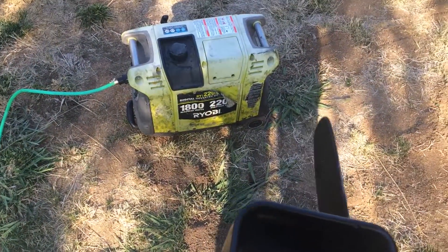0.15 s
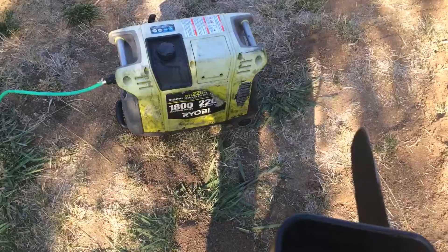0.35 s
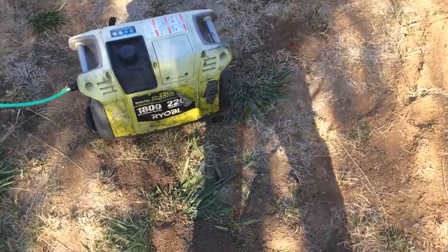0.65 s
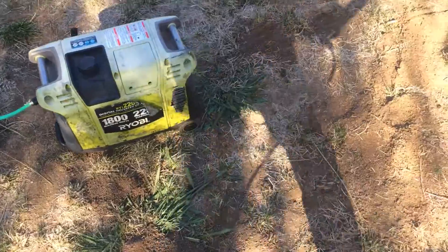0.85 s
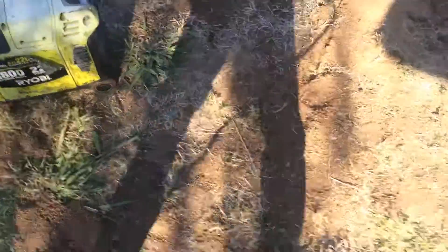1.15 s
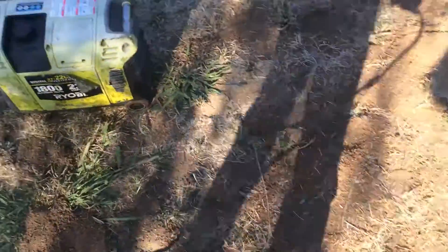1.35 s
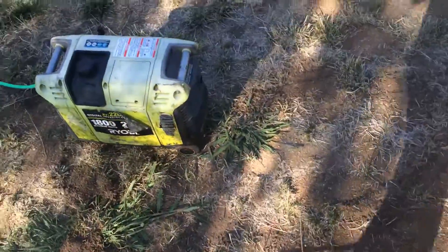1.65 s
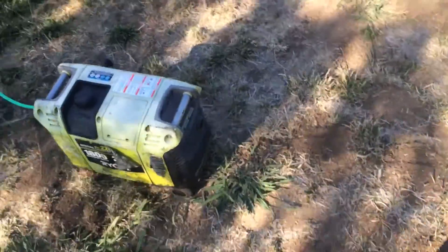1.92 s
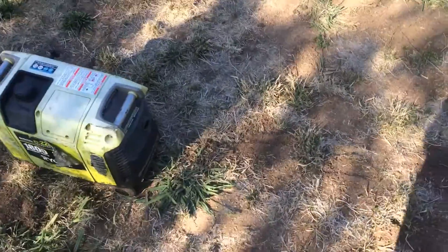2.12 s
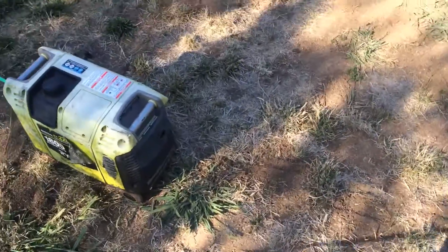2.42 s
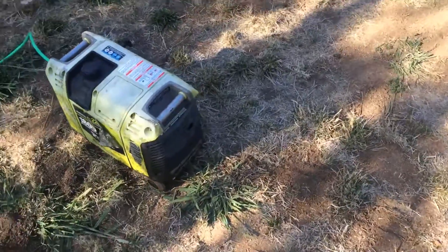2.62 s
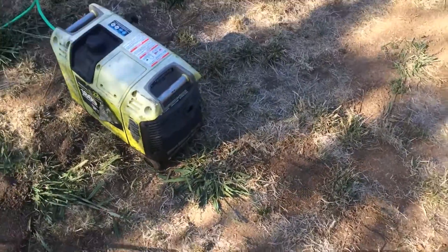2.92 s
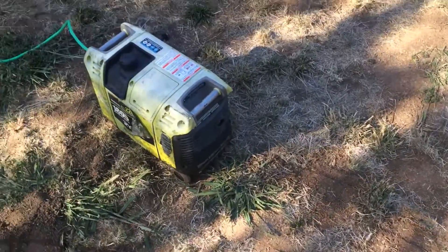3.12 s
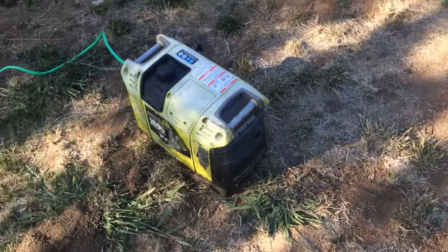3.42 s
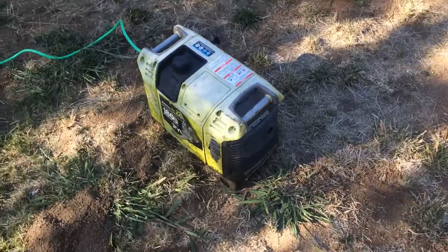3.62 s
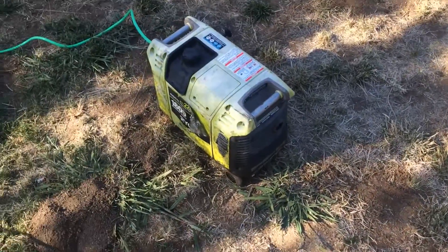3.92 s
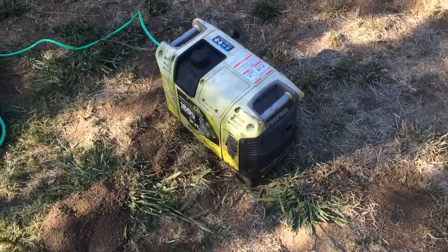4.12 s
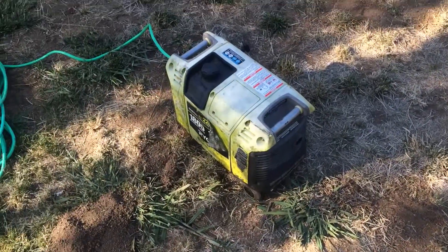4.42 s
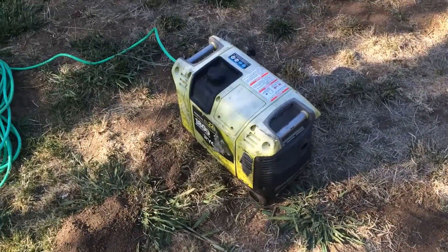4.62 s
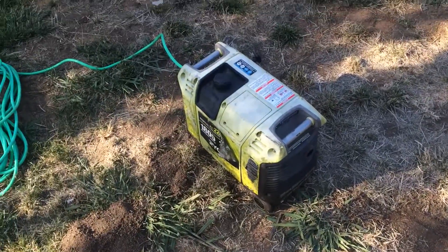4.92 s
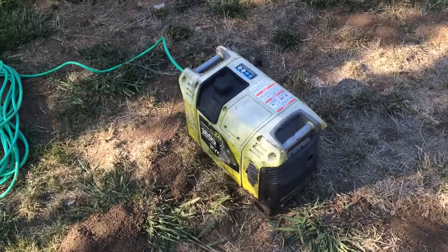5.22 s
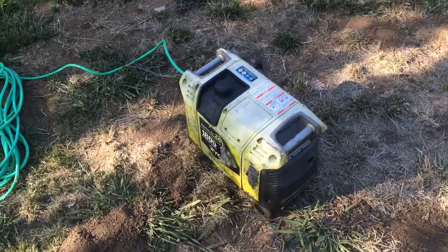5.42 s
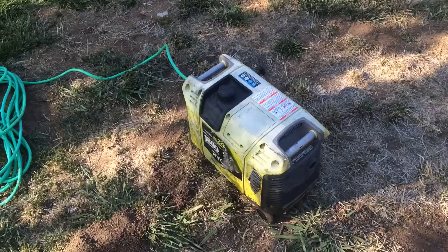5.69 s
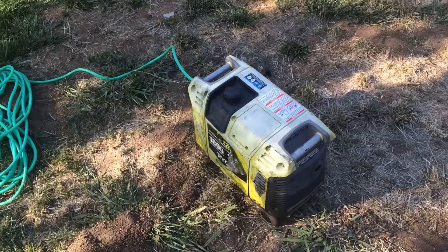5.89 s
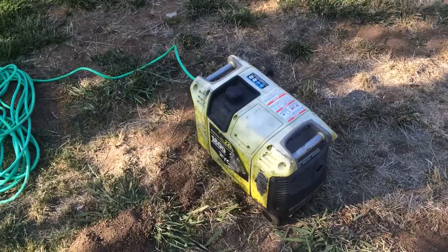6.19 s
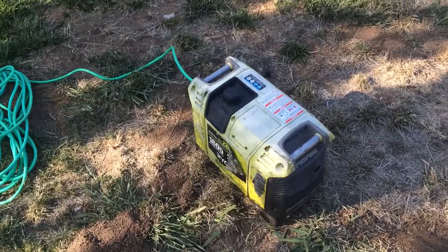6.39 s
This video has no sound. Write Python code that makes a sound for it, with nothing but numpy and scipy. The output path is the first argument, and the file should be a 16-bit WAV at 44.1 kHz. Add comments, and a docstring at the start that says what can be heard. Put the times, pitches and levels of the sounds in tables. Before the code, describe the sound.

An electric chainsaw is running at full speed close by, outdoors, and is released almost at once. Its whine falls and fades within the first second, while the chain rattles and clatters ever slower, with faint metallic scrapes, stopping at about 2.3 seconds. A small generator runs throughout with a low putter, light knocking and rushing air; it grows a little louder over the first two seconds and is heard alone until about 3.3 seconds. Then the saw switches on with a sudden clatter and a loud hiss of chain. Its whine climbs quickly, with thin high whistles, reaching full speed at about 4.2 seconds. The generator sags in pitch around 3.5 seconds and recovers within a second. The saw keeps running freely with a steady high whine and hissing rattle, louder than the generator, until the end at about 6.5 seconds. Everything sounds dry, without echo.

```python
"""A corded electric chainsaw coasts to rest, its chain rattling round the bar, and is switched on again.
Link impacts and sliding friction drive the bar and housing into forced vibration, and the motor's whine
climbs with the shaft to full speed. Beside it on open dirt a small four-stroke generator supplies the
power, with exhaust puffs, knocks and rushing cooling air. It putters alone while the saw is still,
then sags under the returning load and recovers."""
import sys
import numpy as np
from scipy import signal
from scipy.fft import rfft, irfft
from scipy.io import wavfile
from scipy.ndimage import uniform_filter1d

SR = 44100
rng = np.random.default_rng(int(sys.argv[2]) if len(sys.argv) > 2 else 0)


def unload_audio(sound):
    """Save the sound as a 16-bit wav file, at the path given as the first command line argument."""
    columns = np.transpose(np.atleast_2d(sound))
    # keep every value between -1 and 1, then stretch to whole-number steps
    steps = np.round(np.clip(columns, -1, 1) * 32767)
    wavfile.write(sys.argv[1], SR, steps.astype(np.int16))


N = 288855
TIME = np.arange(N) / SR
BINS = np.fft.rfftfreq(N, 1 / SR)

# The generator's governor hunts when the load drops and sags when it returns.
# Each row: time in seconds, firings per second.
FIRING_RATE = [(0.0, 34.8), (0.13, 37.4), (0.31, 39.0), (0.47, 36.7), (0.82, 30.8), (1.09, 35.7),
               (1.4, 33.6), (1.62, 35.3), (2.04, 36.0), (2.74, 35.2), (3.26, 35.3), (3.43, 30.8),
               (3.56, 28.8), (3.79, 32.0), (4.16, 35.6), (4.51, 37.2), (5.25, 36.7), (5.4, 35.5),
               (5.82, 36.3), (6.55, 36.0)]
# Crank hum and exhaust. Each holds: idle level in dB, then the change in dB while the saw runs,
# per Hz of sag in firing rate, and at the generator's flank.
HUM_LEVEL = (-38.5, -3.8, -0.8, -5.5)
EXHAUST_LEVEL = (-35, -0.9, 1.0, -9)
# Firing harmonics from the third up. Each row: relative level in dB at idle, under load, bogged down.
EXHAUST_HARMONICS = [(-13, -17, -14), (-2.5, -10, -9), (-5, -3, -11), (-11, -9, -6), (-12, -18, -1),
                     (-8.5, -8, -14), (-17, -10, -16), (-14, -18, -8), (-15, -15, -13), (-14, -11, -19),
                     (-16, -16, -15), (-16, -20, -14)]
# Muffler chambers. Each row: resonance in Hz, half-width in Hz.
MUFFLER_CHAMBERS = [(124, 6), (232, 10)]
# Blows of exhaust, valves and piston. Each row: place in the firing cycle from 0 to 1,
# resonance in Hz, nominal width in Hz, base level in dB, decay time in seconds.
ENGINE_KNOCKS = [(.63, 540, 400, -44, 0.0026), (.54, 830, 630, -44, 0.0017), (.27, 680, 260, -41.5, 0.0024),
                 (.12, 1296, 260, -39.5, 0.0044), (.24, 1325, 240, -41.5, 0.0044),
                 (.35, 2360, 330, -41.5, 0.0084), (.08, 2370, 350, -43.5, 0.0061),
                 (.8, 2360, 300, -44, 0.0053), (.46, 3450, 160, -47.5, 0.0033),
                 (.74, 1300, 650, -39, 0.012), (0.8, 6900, 900, -51, 0.0044)]
# Spectrum of cooling air and case buzz. Each row: frequency in Hz, relative density in dB.
AIR_SPECTRUM = [(25, -14), (60, -5), (150, -6), (270, -7), (410, 0), (550, -9.5), (1000, -11.5),
                (1330, -10), (1750, -8.5), (2050, -23), (2400, -16), (3100, -11.5), (3600, -10),
                (4400, -12.5), (7100, -15.5), (8400, -17.5), (11000, -15), (15000, -24.5)]
# Spectrum of the generator's high fizz, with the same columns.
FIZZ_SPECTRUM = [(8700, -35), (9600, 11), (10200, -6), (10900, 2), (12200, -16), (15000, -22)]

# Modes of the steel bar. Each row: start and end in seconds, frequency and width in Hz, level in dB.
BAR_MODES = [(0, 0.224, 2830, 70, -41), (.4, .8, 5970, 550, -28), (0.657, 0.752, 2764, 50, -25),
             (0.79, 1.25, 5540, 550, -31.5), (1.15, 1.23, 2240, 50, -32), (1.08, 1.35, 890, 70, -32),
             (1.502, 1.603, 875, 40, -39), (1.73, 1.82, 2210, 40, -34), (3.34, 4.2, 6460, 140, -27.5),
             (4.6, 6.6, 10400, 700, -42), (4.5, 6.6, 5460, 220, -35), (4.7, 6.6, 2390, 130, -33)]
# Gear and commutator tones. Each entry, list by list: multiple of the shaft speed,
# level in dB against the chain noise when driven, the same when coasting.
GEAR_ORDERS = [3, 4, 5, 6, 8, 11, 12, 14, 20, 21, 22, 23, 30]
GEAR_DRIVEN_DB = [-28.5, -27, -25, -28.5, -23.5, -21, -31, -37, -23, -18, -28, -17, -32]
GEAR_COASTING_DB = [-17.5, -23, -28, -14.5, -27, -28, -26, -22, -28, -34, -34, -34, -32]
# Response of bar, chain and housing. Each row: frequency in Hz, relative gain in dB.
BODY_DRIVEN = [(330, -7), (560, -5), (680, 5.5), (1350, -4), (1950, -4.5), (2350, -3.5), (2850, -2),
               (3200, -12.5), (4600, -6), (6100, -0.5), (7200, -5.5), (8600, -2.5), (10500, -5),
               (11800, -7), (15500, -6)]
BODY_COASTING = [(330, 5.5), (600, 11), (850, 19.5), (1300, -2), (1850, 5), (2050, 2), (2300, 4),
                 (2850, -3), (3200, -10), (3900, -9.5), (4700, -11.5), (6000, -7), (7000, -8.5), (8300, -8),
                 (10500, -11), (15500, -9)]
# Low, middle and high chain noise. Each holds: top-speed level in dB with the saw held in front, the same
# held aside for the second run, speed exponent, dB added at full strain, speed in Hz below which it dies.
CLATTER_LEVEL = (-31, -28.5, 0.32, 6.5, 27)
RATTLE_LEVEL = (-23, -25.5, 0.55, 3.5, 68)
HISS_LEVEL = (-15.5, -20.5, 0.94, 11.5, 126)
# Clatter swells as the slowing shaft's tones pass a resonance, and as the chain snatches at restart.
# Each row: start and length in seconds, change of clatter and of rattle in dB.
CLATTER_SWELLS = [(0.18, 0.29, 6.5, -0.5), (0.344, .06, -3, 3.5), (0.77, 0.29, 4, -0.3),
                  (1.058, 0.19, 4, 1), (3.28, 0.063, 7.5, 6.5), (3.33, 0.37, 3.5, 5)]
# High whistles. Each row: start and length in seconds, multiple of the shaft speed, level in dB.
WHISTLES = [(3.55, .42, 20, -36), (3.9, .75, 22, -39.5)]
# The fan's siren beams as the saw is turned. Each row: time in seconds, top-speed level in dB.
FAN_BEAM = [(0, -30), (3.8, -40), (3.95, -28), (4.33, -31), (4.55, -44), (4.88, -40), (5.1, -27),
            (5.42, -27.5), (5.85, -33), (6.5, -30)]
# Partials of the whine. Each entry, list by list: multiple of the shaft speed, relative level in dB.
WHINE_ORDERS = [1, 2 - 11 / 59, 2 * 55 / 59, 2, 2 + 11 / 59]
WHINE_PARTIAL_DB = [-14, -17.5, -11, 0.5, -16.5]

IDLE_FIRING_HZ = 35.4
RELEASE_S, PULL_S = .131, 3.28  # the trigger is let go, then pulled again
TOP_HZ = 475.5  # the saw's nominal top shaft speed


def gain_of(db):
    """Amplitude grows tenfold with every 20 dB."""
    return 10 ** (np.asarray(db) / 20)


def unit_rms(x):
    """Normalisation brings a signal to unit power."""
    return x / np.sqrt(np.mean(x ** 2) + 1e-20)


def curve(points):
    """Linear interpolation joins points in time."""
    return np.interp(TIME, *np.transpose(points))


def arch(start_s, length_s):
    """The root of a half sine gives a rounded swell from 0 to 1 and back."""
    return np.sqrt(abs(np.sin(np.pi * np.clip((TIME - start_s) / length_s, 0, 1))))


def spectrum(points):
    """Interpolation in log frequency gives a gain for every bin."""
    hz, db = np.transpose(points)
    return gain_of(np.interp(np.log(BINS + 1), np.log(hz), db))


def band(lo_hz, hi_hz):
    """Two Butterworth slopes bound a steep pass band."""
    return ((1 + (lo_hz / (BINS + 1)) ** 16) * (1 + (BINS / hi_hz) ** 16)) ** -.5


def coloured(x, gain):
    """A normalised filter preserves the power of white noise."""
    return irfft(rfft(x) * unit_rms(gain), N)


def wander(rate_hz):
    """Low-passed noise gives a slow fluctuation of rms 1."""
    return unit_rms(coloured(rng.standard_normal(N), np.exp(-(BINS / rate_hz) ** 2)))


def strikes(turns, spread_db):
    """An impulse train has one click of random size at each whole turn."""
    count = np.floor(np.maximum.accumulate(turns))
    return np.diff(count, prepend=count[0]) * gain_of(spread_db * rng.standard_normal(N))


def cooling_air(cycles, air_db=-35, fizz_db=-48, throb=.15):
    """Amplitude modulation at the crank and firing rates makes the air and its high fizz throb."""
    pulse = 1 + throb * np.cos(4 * np.pi * (cycles - .6)) + .053 * np.cos(2 * np.pi * (cycles - .45))
    air = gain_of(air_db) * coloured(rng.standard_normal(N) * pulse, spectrum(AIR_SPECTRUM))
    fizz = gain_of(fizz_db) * coloured(rng.standard_normal(N) * pulse, spectrum(FIZZ_SPECTRUM))
    return air + fizz


def knocks(cycles, rasp_share=.42):
    """Impacts excite damped vibration of the case, part alike in every cycle and part a fresh rasp."""
    t, out = TIME[:1024], 0
    for place, hz, width, db, decay in ENGINE_KNOCKS:
        hits = strikes(cycles - place + .0013 * wander(22), spread_db=.2)
        envelope = np.exp(-t / decay)
        ring = signal.oaconvolve(hits, envelope * rng.standard_normal(len(t)))[:N]
        rasp = signal.oaconvolve(hits, envelope)[:N] * rng.standard_normal(N)
        panel = band(286, 10000) / (1 + 1j * (BINS - hz) / (width * .86)) ** 2
        ring, rasp = unit_rms(coloured(ring, panel)), unit_rms(coloured(rasp, panel))
        out += gain_of(db) * unit_rms((1 - rasp_share) * ring + rasp_share * rasp)
    return out


def exhaust(cycles, firing, load, hum_db, exhaust_db, puff_place=.66, uneven_db=2.45):
    """One puff every second crank turn forms a harmonic series, heard above the crank's hum."""
    bogged = load * np.clip((IDLE_FIRING_HZ - firing) / 2.5, 0, 1)
    phase = 2 * np.pi * (cycles - puff_place)
    out = gain_of(hum_db + uneven_db * wander(23)) * np.cos(2 * phase)
    for order, (idle_db, load_db, bogged_db) in enumerate(EXHAUST_HARMONICS, 3):
        colour_db = idle_db + (load_db - idle_db) * load + (bogged_db - load_db) * bogged
        # each chamber delays harmonics above it by half a cycle, drawing the puff out into a drone
        lag = sum(np.pi / 2 + np.arctan((order * firing - hz) / width) for hz, width in MUFFLER_CHAMBERS)
        out += gain_of(exhaust_db + colour_db + uneven_db * wander(26)) * np.cos(order * phase - lag)
    return np.sqrt(2) * out


def engine_levels(firing, sawing, walk_s=2.0):
    """Hum and exhaust, in dB, sound quieter while the saw runs; the exhaust swells as the engine sags."""
    at_flank = np.clip(1 - TIME / walk_s, 0, 1)  # the listener walks from the quiet flank to the exhaust
    return [idle_db + sawing_db * sawing + sag_db * (IDLE_FIRING_HZ - firing) + flank_db * at_flank
            for idle_db, sawing_db, sag_db, flank_db in (HUM_LEVEL, EXHAUST_LEVEL)]


def generator():
    """The firing cycle of one cylinder in a plastic case synchronises air, exhaust and knocks."""
    firing = curve(FIRING_RATE)
    load = uniform_filter1d(tension(), size=8000)
    hum_db, exhaust_db = engine_levels(firing, load)
    cycles = np.cumsum(firing * (1 + .0025 * wander(10))) / SR
    effort = gain_of(.72 * (exhaust_db + 36.5))  # the engine knocks harder when it labours
    air = cooling_air(cycles)
    return air + exhaust(cycles, firing, load, hum_db, exhaust_db) + effort * knocks(cycles)


def shaft_speed(release_hz=471, drag_s=1.418, friction_hz_per_s=91.3,
                surge_share=.317, surge_s=.095, settle_s=.27, creep_hz_per_s=.86):
    """Air drag and chain friction stop the saw; under power its speed in Hz recovers exponentially."""
    coasting_s, driven_s = np.maximum(TIME - RELEASE_S, 0), np.maximum(TIME - PULL_S, 0)
    braking_hz = friction_hz_per_s * drag_s
    falling = np.maximum((release_hz + braking_hz) * np.exp(-coasting_s / drag_s) - braking_hz, 0)
    deficit = surge_share * np.exp(-driven_s / surge_s) + (1 - surge_share) * np.exp(-driven_s / settle_s)
    top = TOP_HZ + creep_hz_per_s * driven_s  # creeps up as the saw warms
    return np.where(TIME < PULL_S, falling, top * (1 - deficit))


def tension(taut_s=.045, coasting_share=.35):
    """Chain tension, 0 to 1, falls with speed on the run-down and is full once the motor pulls again."""
    pulled = np.clip((TIME - PULL_S) / taut_s, 0, 1)
    return pulled + (1 - pulled) * coasting_share * shaft_speed() / TOP_HZ


def strain(speed, rise_s=.066):
    """Accelerating torque, 0 to 1, builds after switch-on and vanishes at top speed."""
    building = np.clip((TIME - PULL_S) / rise_s, 0, 1) ** 2
    return building * np.clip(1 - speed / TOP_HZ, 0, 1)


def speed_db(speed, power):
    """Amplitude follows a power law of shaft speed, with 0 dB at top speed."""
    return 20 * power * np.log10(speed / TOP_HZ + 1e-6)


def bar_rings():
    """Narrow resonances of the bar swell and fade as the chain catches and scrapes it."""
    out = 0
    for start, end, hz, width, db in BAR_MODES:
        mode = 1 / (1 + ((BINS - hz) / width * 2) ** 2)
        out += gain_of(db) * arch(start, end - start) * coloured(rng.standard_normal(N), mode)
    return out


def whistles(turns):
    """High shaft harmonics from fan and commutator come and go as the motor climbs."""
    out = 0
    for start, length, order, db in WHISTLES:
        out += arch(start, length) * gain_of(db + 2 * wander(10)) * np.cos(2 * np.pi * order * turns)
    return np.sqrt(2) * out


def fan_siren(turns, speed, blades=10):
    """The cooling fan sounds at its blade-passing frequency."""
    level_db = curve(FAN_BEAM) + speed_db(speed, power=1.6) + wander(5.2)
    return np.sqrt(2) * gain_of(level_db) * np.cos(2 * np.pi * blades * turns)


def gear_tones(turns, speed, driven, fade_db=36):
    """Periodic contact in gears and commutator gives shaft harmonics, which fade at low speed."""
    out = 0
    for order, on_db, off_db in zip(GEAR_ORDERS, GEAR_DRIVEN_DB, GEAR_COASTING_DB):
        level_db = off_db + (on_db - off_db) * driven + 3 * wander(30)
        out += gain_of(level_db) * np.cos(2 * np.pi * (order * turns + rng.random()))
    return np.sqrt(2) * out * gain_of(-fade_db * np.maximum(1 - speed / 300, 0))


def chain_force(turns, speed, driven, links_per_turn=55 / 59, impacts=.36, pulsing=.048):
    """Links striking the sprocket and friction pulsing with them form a broadband excitation."""
    links = turns * links_per_turn + .02 * wander(40)
    blows = strikes(links, spread_db=2.0) * np.sqrt(SR / (speed + 30))
    friction = rng.standard_normal(N) * (1 + pulsing * np.cos(2 * np.pi * links))
    # the chain flaps more when slack and less while the motor accelerates
    acceleration = np.clip(np.gradient(speed) * SR / 1000, 0, 1)
    flap = gain_of((.65 + .2 * (1 - driven) - .3 * acceleration) * wander(46))
    tightening = 1 + .059 * np.cos(2 * np.pi * links / 5)  # once in each sprocket turn
    return (friction + impacts * blows) * flap * tightening / np.sqrt(1 + impacts ** 2 + pulsing ** 2 / 2)


def chain_levels(speed, crawl_power=1.4):
    """Clatter, rattle and hiss, in dB, follow power laws of speed and rise with strain."""
    levels = []
    for front_db, aside_db, power, strain_db, crawl_hz in CLATTER_LEVEL, RATTLE_LEVEL, HISS_LEVEL:
        run_db = np.where(TIME < PULL_S, front_db, aside_db)
        crawl_db = crawl_power * 20 * np.log10(np.clip(speed / crawl_hz, 1e-3, 1))
        levels.append(run_db + speed_db(speed, power) + crawl_db + strain_db * np.sqrt(strain(speed)))
    clatter, rattle, hiss = levels
    for start, length, clatter_db, rattle_db in CLATTER_SWELLS:
        swell = arch(start, length)
        clatter, rattle = clatter + clatter_db * swell, rattle + rattle_db * swell
    return clatter, rattle, hiss


def chain(turns, speed, dull_db=4):
    """Bar and housing radiate by forced vibration; the hiss dulls as the chain slows."""
    driven = tension()
    force = chain_force(turns, speed, driven) + gear_tones(turns, speed, driven)
    clatter_db, rattle_db, hiss_db = chain_levels(speed)
    slowness = 1 - speed / speed.max()
    out = 0
    for body, share in (spectrum(BODY_DRIVEN), driven), (spectrum(BODY_COASTING), 1 - driven):
        clatter = gain_of(clatter_db) * coloured(force, body * band(390, 1310))
        rattle = gain_of(rattle_db) * coloured(force, body * band(1273, 3500))
        hiss = coloured(force, body * band(3230, 15100))
        treble = irfft(rfft(hiss) * band(7000, 20000), N)
        hiss += treble * (gain_of(-.5 - dull_db * slowness) - 1)
        out += share * (clatter + rattle + gain_of(hiss_db) * hiss)
    return out


def whine(turns, speed, top_db=-20.5, strain_db=10, housing_hz=879.5, housing_width_hz=39):
    """A two-pole motor sings at twice its shaft speed; modulation by the sprocket adds sidebands."""
    resonance_db = 4 * np.exp(-((2 * speed - housing_hz) / housing_width_hz) ** 2)
    level_db = top_db + speed_db(speed, power=2.38) + strain_db * strain(speed) + resonance_db
    out = 0
    for order, db in zip(WHINE_ORDERS, WHINE_PARTIAL_DB):
        if order == 1:  # the rotor's unbalance is strongest when driven near full speed
            db -= 7 * (1 - tension() + np.clip((470 - speed) / 30, 0, 1))
        tone = np.cos(2 * np.pi * (order * turns + rng.random()))
        out += gain_of(level_db + db + 1.04 * wander(51)) * tone
    return np.sqrt(2) * out


def chainsaw():
    """One shaft couples motor, fan and chain, so their pitches rise and fall together."""
    speed = shaft_speed() * (1 + .0004 * wander(12))
    turns = np.cumsum(speed) / SR
    chain_noise = chain(turns, speed)
    spun_up = np.clip((speed - 170) / 40, 0, 1)
    motor = spun_up * (whine(turns, speed) + fan_siren(turns, speed))
    return chain_noise + motor + whistles(turns) + bar_rings()


def scene():
    """In a free field only direct sound arrives: both machines are close, dry and centred."""
    sound = chainsaw() + generator()
    return np.array([sound, sound])


def record(dry, ceiling=.78, cutoff_hz=15400):
    """Soft saturation rounds the highest peaks, and a low-pass filter limits the band."""
    soft = dry / (1 + abs(dry / ceiling) ** 6) ** (1 / 6)
    low_pass = signal.firwin(511, cutoff_hz, window=("kaiser", 9), fs=SR)
    return signal.oaconvolve(soft, low_pass[None], "same")


dry = scene()
out = record(dry)
unload_audio(out)
```